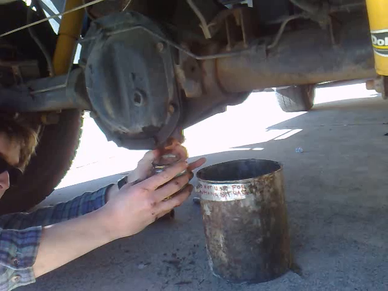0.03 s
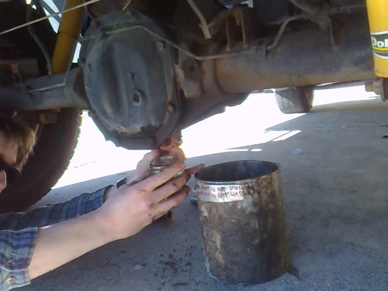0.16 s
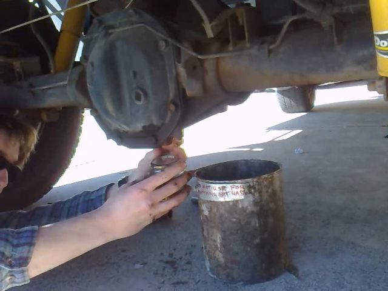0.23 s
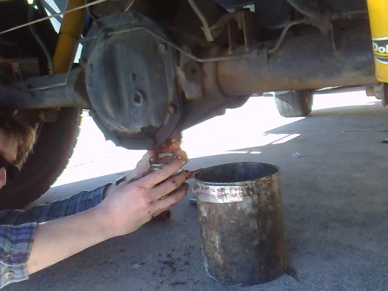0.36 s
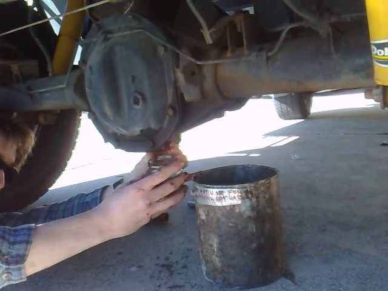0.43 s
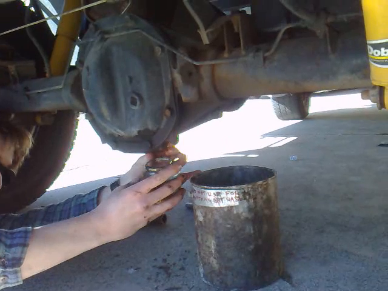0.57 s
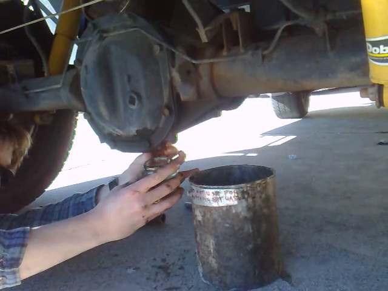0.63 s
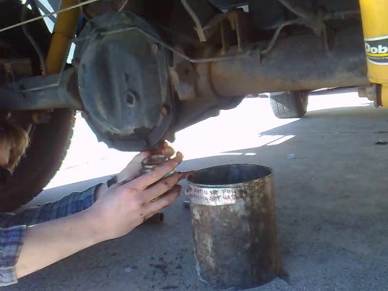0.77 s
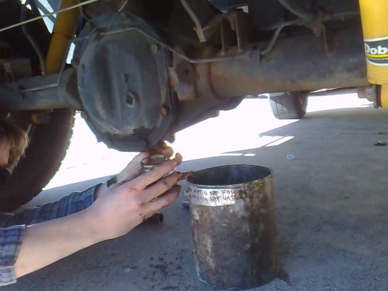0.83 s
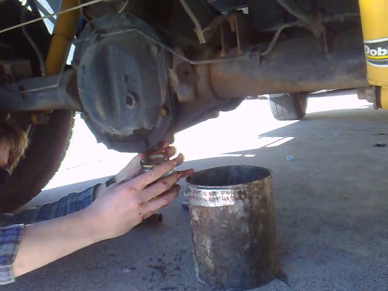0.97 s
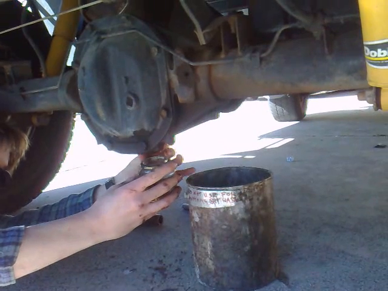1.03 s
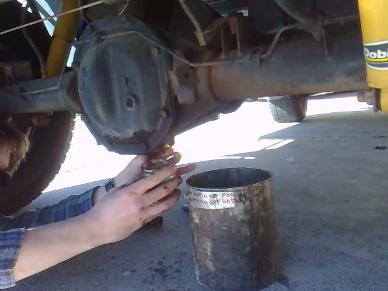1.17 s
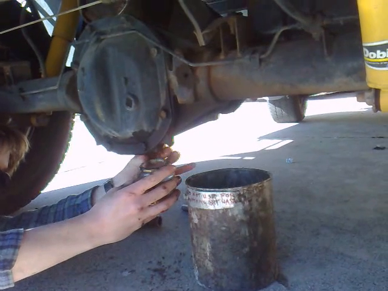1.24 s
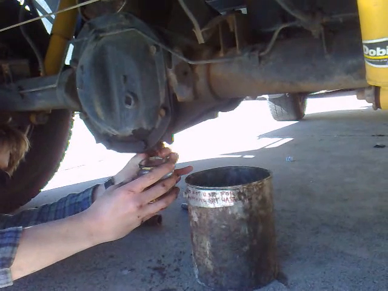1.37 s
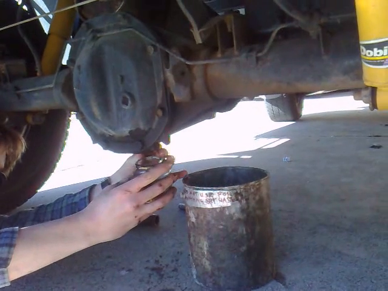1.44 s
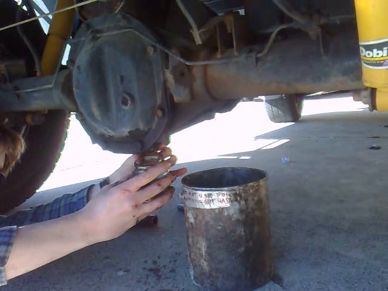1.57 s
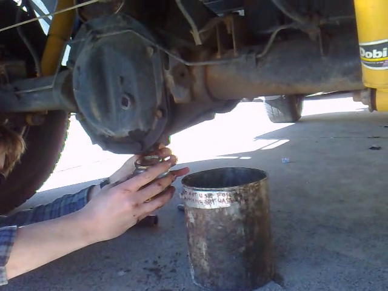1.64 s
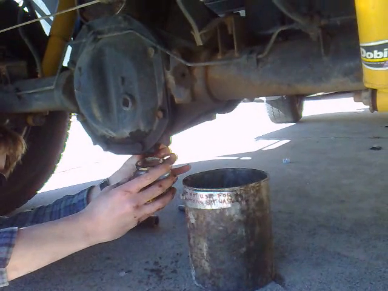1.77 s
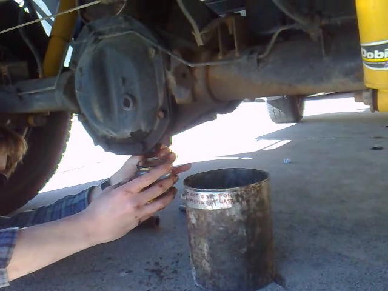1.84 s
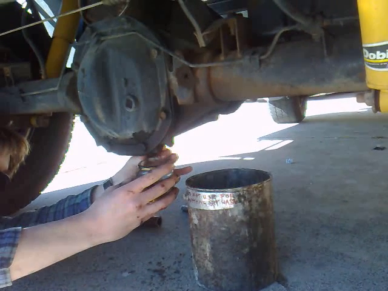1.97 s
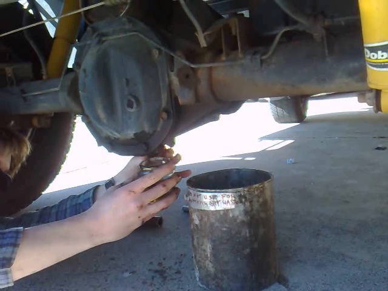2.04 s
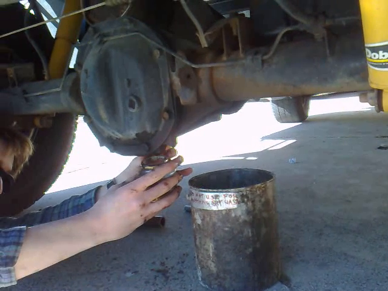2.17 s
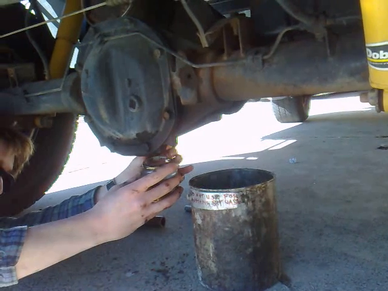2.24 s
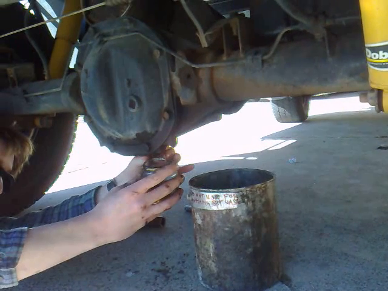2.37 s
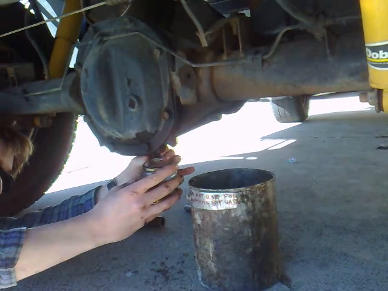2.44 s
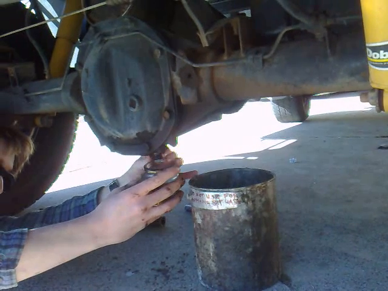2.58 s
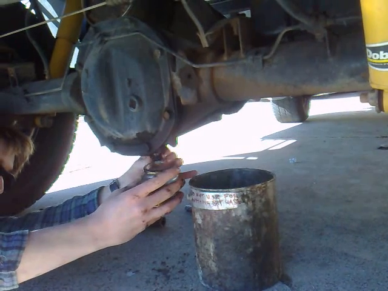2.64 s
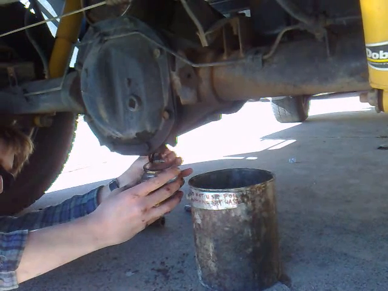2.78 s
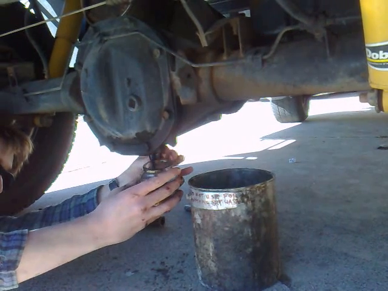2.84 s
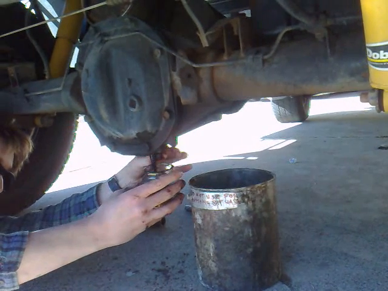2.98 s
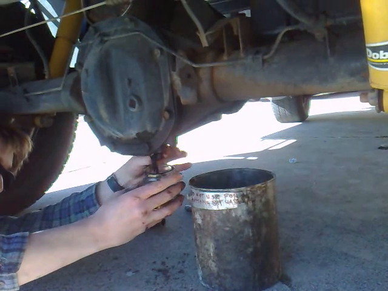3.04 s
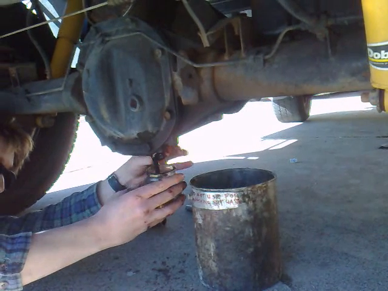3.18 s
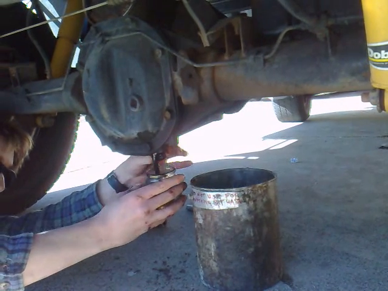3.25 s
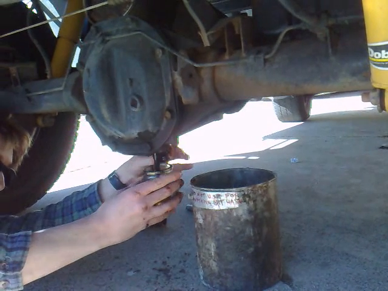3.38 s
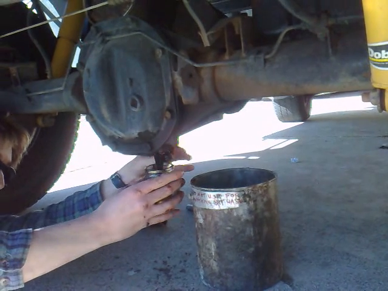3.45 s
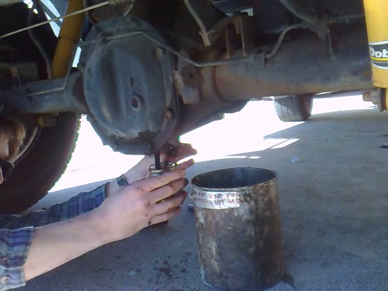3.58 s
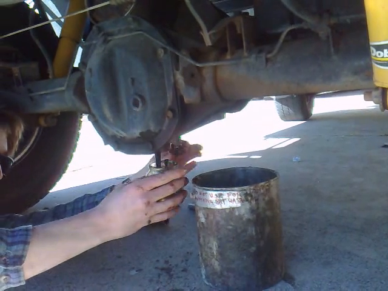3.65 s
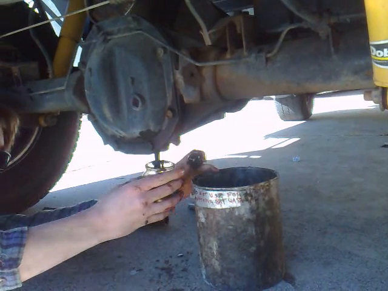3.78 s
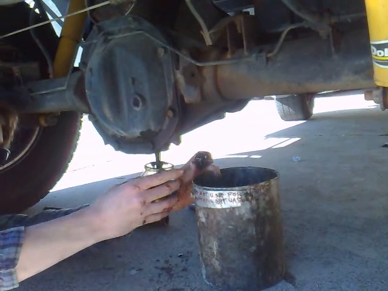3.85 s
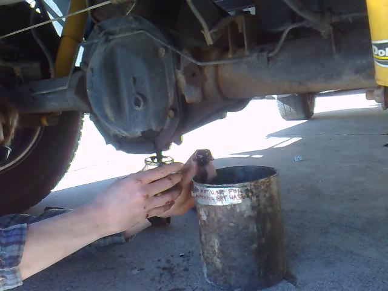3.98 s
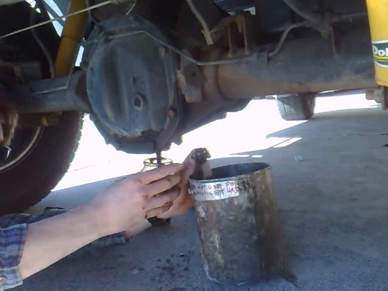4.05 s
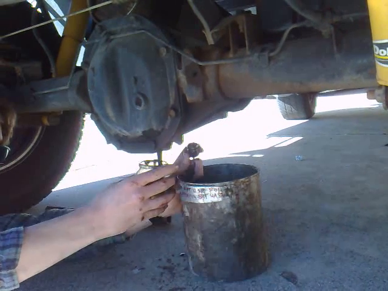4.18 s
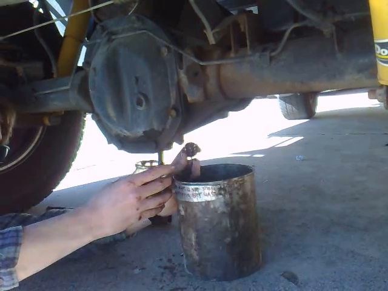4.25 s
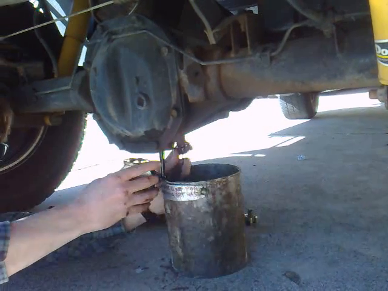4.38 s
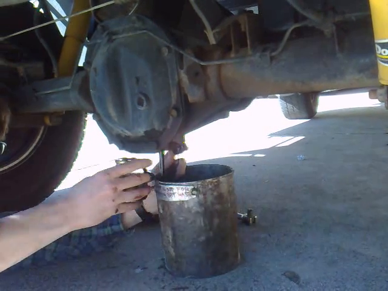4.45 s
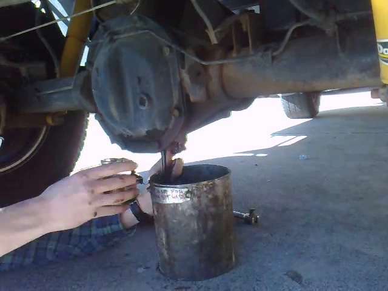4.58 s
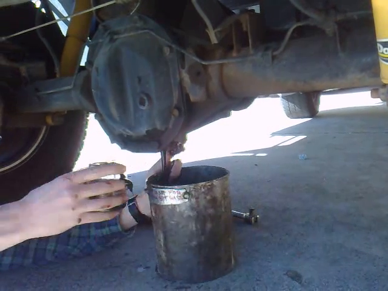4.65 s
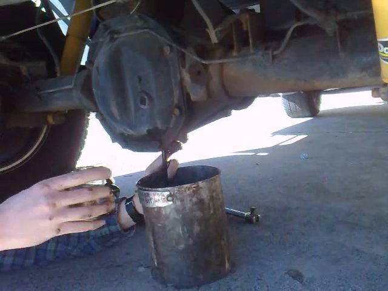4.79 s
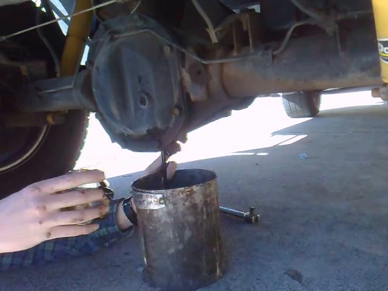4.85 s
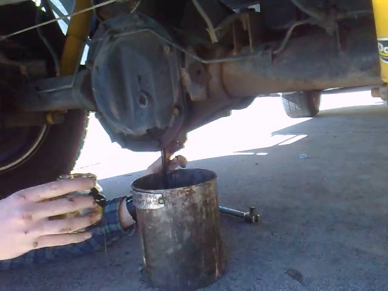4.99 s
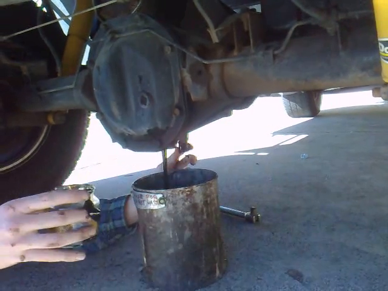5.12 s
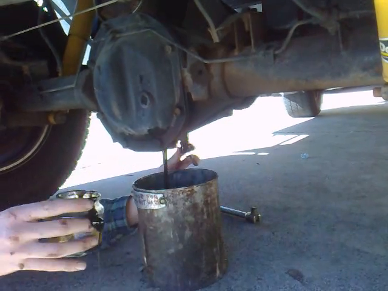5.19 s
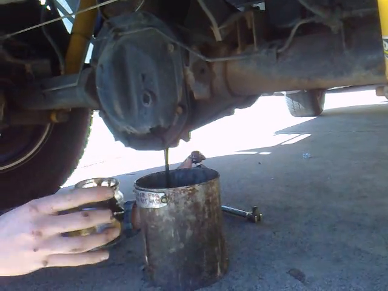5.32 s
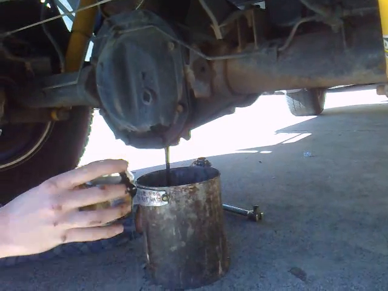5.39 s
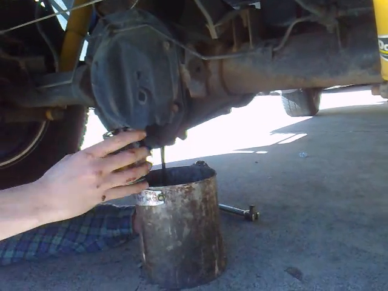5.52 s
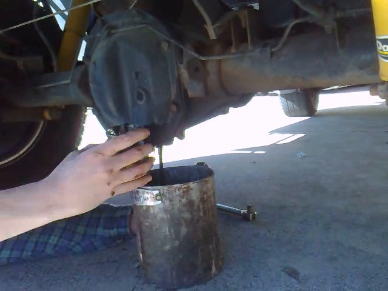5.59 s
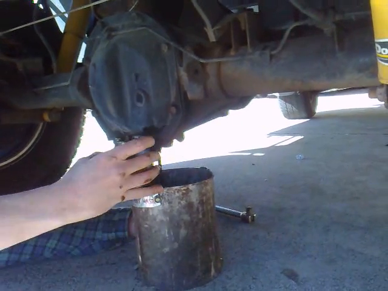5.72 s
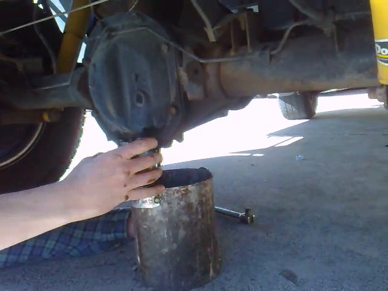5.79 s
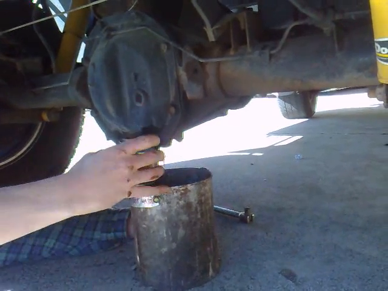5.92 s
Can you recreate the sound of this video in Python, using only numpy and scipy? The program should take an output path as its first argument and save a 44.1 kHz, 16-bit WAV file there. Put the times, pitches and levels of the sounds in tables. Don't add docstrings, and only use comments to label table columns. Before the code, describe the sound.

Faint traffic rumble with tiny ticks and a glass tap, then a loud, jerky metallic scrape of an empty pail on concrete.

```python
import sys
import numpy as np
from scipy import signal
from scipy.fft import rfft, irfft, next_fast_len
from scipy.io import wavfile
from scipy.ndimage import uniform_filter1d, map_coordinates

SR = 44100
rng = np.random.default_rng(int(sys.argv[2]) if len(sys.argv) > 2 else 0)


def transcribe(u):
    v = np.clip(np.atleast_2d(u).T, -1, 1)
    q = np.round(v * 32767).astype(np.int16)
    wavfile.write(sys.argv[1], SR, q)


def invert_db(level):
    return 10 ** (np.asarray(level, dtype=float) / 20)


N = 262130


def unit(x):
    return x / np.sqrt(np.mean(x ** 2) + 1e-20)


def along(points, hz):
    f, v = np.transpose(points)
    return np.interp(np.log(hz + 1), np.log(f + 1), v)


def curves(rows, off=None):
    s, *cols = np.transpose(rows)
    return [np.interp(np.arange(N) / SR, s, c, off, off) for c in cols]


def wobble(rate):
    knots = rng.standard_normal(int(N * rate / SR) + 4)
    coarse = np.arange(0, N + 64, 64)
    return np.interp(np.arange(N), coarse, map_coordinates(knots, [coarse * rate / SR]))


def filtered(x, response):
    m = next_fast_len(N + SR // 2)
    return irfft(rfft(x, m) * response(np.fft.rfftfreq(m, 1 / SR)), m)[:N]


def coloured(x, spectrum):
    return filtered(x, lambda hz: invert_db(along(spectrum, hz)))


def causal(x, spectrum):
    c = irfft(np.log(invert_db(along(spectrum, np.fft.rfftfreq(4096, 1 / SR))) + 1e-6))
    c[1:2048] *= 2
    c[2049:] = 0
    return signal.fftconvolve(x, irfft(np.exp(rfft(c))))[:N]


def resonant(x, modes, rocking_db, rate):
    m = next_fast_len(N)
    f, spec = np.fft.rfftfreq(m, 1 / SR), rfft(x, m)
    bank = [invert_db(db) * 1j * f * w / (c * c - f * f + 1j * f * w) for c, w, db in modes]
    y = sum(invert_db(rocking_db * wobble(rate)) * irfft(spec * h, m)[:N] for h in bank)
    return y / np.sqrt(np.mean(np.sum(np.abs(bank) ** 2, axis=0)))


def rush(spectrum, patchy_db):
    z = signal.stft(rng.standard_normal(N + 512), nperseg=512)[2]
    field = uniform_filter1d(uniform_filter1d(rng.standard_normal(z.shape), 6, 0), 14, 1)
    patchy = signal.istft(z * invert_db(patchy_db * unit(field)), nperseg=512)[1][:N]
    return unit(coloured(patchy, spectrum))


def burst(s, t60, attack):
    env, t = np.zeros(N + SR), np.arange(SR // 4) / SR
    env[round(s * SR):][:len(t)] = invert_db(-60 * t / t60) * (1 - np.exp(-t / attack))
    return env[:N]


def ring(s, modes, attack=0.0006):
    out, t = np.zeros(N + SR), np.arange(SR // 4) / SR
    tones = sum(invert_db(db - 60 * t / t60) * np.sin(2 * np.pi * hz * t) for hz, db, t60 in modes)
    out[round(s * SR):][:len(t)] = (1 - np.exp(-t / attack)) * tones
    return out[:N]


def chatter(rate, spread_db, t60):
    starts = (rng.random(N) < rate / SR) * invert_db(spread_db * rng.exponential(1, N).clip(0, 3))
    puffs = signal.lfilter([1], [1, -invert_db(-60 / (t60 * SR))], starts)
    return unit(puffs * rng.standard_normal(N))


# (frequency [Hz], decay time t60 [s])
UNDERBODY_DECAY = [(200, 0.18), (2000, 0.11), (10000, .07)]


def underbody(x):
    hz, t, z = signal.stft(rng.standard_normal(SR // 4), SR, nperseg=256)
    decay = invert_db(-60 * t / along(UNDERBODY_DECAY, hz)[:, None])
    tail = signal.istft(z * decay, SR, nperseg=256)[1]
    return signal.fftconvolve(np.pad(x, (150, 0)), tail / np.linalg.norm(tail))[:N]


# (frequency [Hz], spectral level [dB per Hz])
HISS_SPECTRUM = [(2940, -48), (5000, -3.5), (6410, -7.5), (8540, -7.5), (15100, -7), (16000, -4)]
DUCK_DB, DUCK_FROM_S, DUCK_HOLD_S, RECOVER_S = 6, 4.36, 0.92, 0.3


def preamp_hiss():
    since = np.arange(N) / SR - DUCK_FROM_S
    ducked = (since > 0) * np.clip(1 - (since - DUCK_HOLD_S) / RECOVER_S, 0, 1)
    return invert_db(-65.0 - DUCK_DB * ducked) * unit(coloured(rng.standard_normal(N), HISS_SPECTRUM))


def engine(rows, orders, unsteady_db):
    hz, = curves(np.array(rows)[:, :2])
    db, = curves(np.array(rows)[:, ::2], off=-120)
    turn = 2 * np.pi * np.cumsum(hz * (1 + 0.0059 * wobble(8))) / SR
    tones = sum(invert_db(g + unsteady_db * wobble(3.043)) * np.sin(k * turn) for k, g in orders)
    return invert_db(db - 0.5) * tones


# (frequency [Hz], spectral level [dB per Hz])
RUMBLE_SPECTRUM = [(4.7, -61.5), (8.0, -30.5), (22, -31.5), (40, -10.5), (75, -0.5), (93, -1), (114, -9.5),
                   (182, -26), (200, -18), (260, -45.5), (440, -120)]
ROAD_SPECTRUM = [(76, -31), (130, -1), (215, -6), (242, -3.5), (313, -6), (1000, -26.5), (1300, -44.5),
                 (2200, -120)]
TREAD_SPECTRUM = [(410, -41), (700, -5.5), (931, -5), (1330, -2.5), (1460, -2.5), (2280, 0), (2980, -7.5),
                  (4520, -10.5), (8000, -26.5), (10400, -44.5), (17600, -120)]
# (time [s], half width [s], swell [dB])
VEHICLE_PASSES = [
    (.3, 0.16, 7),
    (2.5, 0.49, 3),
    (4.2, 0.65, 4),
    (5.63, 0.25, 9),
]
# (time [s], firing frequency [Hz], level [dB])
TRUCK_RUN = [
    (0, 95.3, -58.5),
    (1, 102.3, -52.5),
    (2, 107, -54.5),
    (3, 111.1, -54),
    (3.5, 110.6, -63.5),
]
CAR_RUN = [(2.8, 66.1, -44.5), (3.15, 74.2, -48), (3.39, 68.6, -45.5), (4.0, 67.2, -44), (4.3, 66.8, -34),
           (4.56, 65.65, -42), (4.72, 67, -37.5), (5.19, 77.8, -47), (5.46, 89.2, -41), (5.94, 90.3, -41)]
# (multiple of firing frequency, level [dB])
TRUCK_HARMONICS = [(1.55, -0.5), (2, -3.5), (3, -10)]
CAR_HARMONICS = [(1, 4), (2, -11), (3, -15.5), (4, -19)]
RUMBLE_DB, ROAD_DB, TYRE_DB = -44, -55.5, -62
ROAD_SWELL = 0.61


def traffic():
    t = np.arange(N) / SR
    swell_db = sum(db * np.exp(-((t - s) / width) ** 2) for s, width, db in VEHICLE_PASSES)
    far = invert_db(RUMBLE_DB + 1.7 * wobble(3.01)) * rush(RUMBLE_SPECTRUM, patchy_db=1.5)
    far += invert_db(ROAD_DB + ROAD_SWELL * swell_db) * rush(ROAD_SPECTRUM, patchy_db=1.5)
    far += invert_db(TYRE_DB + swell_db) * rush(TREAD_SPECTRUM, patchy_db=0.6)
    far += engine(TRUCK_RUN, TRUCK_HARMONICS, unsteady_db=2.5)
    return far + engine(CAR_RUN, CAR_HARMONICS, unsteady_db=2.0)


# (frequency [Hz], spectral level [dB per Hz])
CLOTH_SPECTRUM = [(240, -41.5), (400, -8), (474, 0.5), (1150, -3), (2010, -4.5), (5700, -11.5), (9000, -31),
                  (11700, -58.5), (19800, -120)]
# (start [s], length [s], level [dB])
ARM_MOVES = [
    (-.1, 0.16, -47.5),
    (.16, .3, -51),
    (.36, .12, -54),
    (3.907, 0.41, -59),
    (5.38, 0.39, -56),
    (5.697, 0.37, -57.5),
]


def sleeve():
    t = np.arange(N) / SR
    sweep = sum(invert_db(db) * np.sin(np.pi * np.clip((t - s) / length, 0, 1)) ** 2 for s, length, db in ARM_MOVES)
    return sweep * unit(coloured(chatter(1496, spread_db=-5.0, t60=0.011), CLOTH_SPECTRUM))


# (time [s], length [s], frequency [Hz], width [Hz], level [dB])
RUBS = [
    (.68, 0.13, 1360, 100, -63.5),
    (1.47, 0.04, 3660, 111.1, -64),
    (1.83, 0.067, 556, 160, -60.5),
    (2.56, .025, 4600, 300, -62),
    (2.693, .03, 1410, 400, -55.5),
    (2.828, 0.024, 600, 150, -55),
    (3.623, 0.038, 1350, 120, -61),
    (5.427, 0.048, 2898, 200, -56),
]


def squeaks():
    t, out = np.arange(N) / SR, np.zeros(N)
    for s, length, hz, width, db in RUBS:
        band = unit(coloured(rng.standard_normal(N), [(hz - 3 * width, -60), (hz, 0), (hz + 3 * width, -60)]))
        out += invert_db(db) * np.sin(np.pi * np.clip((t - s) / length, 0, 1)) * band
    return out


# (time [s], peak level [dB], pitch [Hz])
SMALL_TICKS = [(0.424, -44.5, 1900), (0.7864, -53, 1900), (0.83, -44.5, 3630), (1.462, -47, 3670),
               (1.4894, -65, 3700), (1.6723, -44, 3280), (2.1031, -45, 4240), (2.51, -50, 4000),
               (2.5648, -53, 4580), (2.707, -42, 1300), (2.7433, -44, 4260), (2.918, -42, 2040),
               (3.3494, -49, 4860), (3.3852, -47, 4030), (3.6314, -53, 2733), (4.0255, -43.5, 2650),
               (5.3076, -52.5, 2845), (5.368, -40, 2890), (5.445, -47, 2930), (5.6954, -53, 2610),
               (5.7804, -47, 2050), (5.8928, -41, 4900)]
# (frequency [Hz], level [dB])
TICK_CRACK = [(300, -20), (1200, -4), (3000, 0), (5800, -3), (7000, -20), (15000, -35)]
TICK_T60_S = 0.018


def ticks():
    grit = unit(coloured(rng.standard_normal(N), TICK_CRACK))
    out = np.zeros(N)
    for s, db, hz in SMALL_TICKS:
        out += invert_db(db - 11) * ring(s, [(hz, 0, TICK_T60_S)])
        out += invert_db(db - 3) * burst(s, 0.0173, 0.00079) * grit
    return out


# (frequency [Hz], level [dB], decay time t60 [s])
LATCH_MODES = [(830, -10.5, 0.016), (2509, 1, 0.0096), (2123, -9, 0.007), (3013, 0, 0.0072),
               (3530, 5, 0.0077), (3840, 0.5, 0.0069), (4980, 0.5, 0.011), (5500, -4, 0.006),
               (8640, -19, 0.0079)]
HOUSING_MODES = [(200, 0.5, 0.0406)]
# (frequency [Hz], level [dB])
LATCH_CRACK = [(500, -3.5), (1500, -8), (3000, -1.5), (5500, -10), (8000, -19), (15000, -32)]
CLICK_S = 0.1361


def click():
    crack = burst(CLICK_S, 0.011, 0.0002) * unit(coloured(rng.standard_normal(N), LATCH_CRACK))
    rattle = burst(CLICK_S, 0.06, 0.0003) * rng.standard_normal(N)
    latch = ring(CLICK_S, LATCH_MODES, attack=0.00025)
    thump = ring(CLICK_S + 0.0024, HOUSING_MODES, attack=0.0006)
    return invert_db(-17) * crack + invert_db(-36) * rattle + invert_db(-6.0) * latch + invert_db(-14) * thump


# (frequency [Hz], level [dB], decay time t60 [s])
JAR_MODES = [(780, 1.5, 0.042), (850, -7, 0.025), (1350, -14, 0.041), (4960, -14, .05), (5350, -14, 0.058),
             (6480, -6, .025), (6500, -4, 0.045)]
# (frequency [Hz], level [dB])
PLUG_CRACK = [(500, -32), (1000, 0.5), (2300, 3.5), (3500, -4), (5200, -6.5), (6500, -7.5), (8000, -19),
              (16000, -20)]


def jar():
    crack = burst(3.7097, 0.029, 0.0021) * unit(coloured(rng.standard_normal(N), PLUG_CRACK))
    return invert_db(-30.5) * ring(3.7112, JAR_MODES, attack=0.00074) + invert_db(-31.0) * crack


# (time [s], level [dB], tick re knock [dB])
HAND_KNOCKS = [
    (4.171, -37.5, -24),
    (4.249, -30, -9),
    (4.3586, -14.5, -15),
]
# (frequency [Hz], level [dB], decay time t60 [s])
HELD_MODES = [(321.6, -8, 0.048), (466, -2.5, 0.062), (506, 2, 0.087), (566, -3.5, 0.15),
              (680, -1.5, 0.037), (810, -10.5, 0.068), (945, -11, 0.044)]


def knocks():
    grit = unit(coloured(rng.standard_normal(N), CLOTH_SPECTRUM))
    out = np.zeros(N)
    for s, db, tick_db in HAND_KNOCKS:
        tick = invert_db(tick_db) * burst(s, 0.023, 0.00087) * grit
        out += invert_db(db) * (ring(s, HELD_MODES, attack=0.0024) + tick)
    return out


# (start [s], fastest [s], end [s], rim scrape level [dB], weight on the bottom [dB])
PAIL_SHOVES = [
    (4.359, 4.395, 4.415, -22, 1),
    (4.409, 4.466, 4.512, -17, 1),
    (4.526, 4.555, 4.68, -19, -1.5),
    (4.627, 4.765, 4.87, -19, -4.5),
    (4.842, 4.863, 4.94, -16.5, -10),
    (4.93, 4.958, 4.997, -19.5, -12.5),
    (4.995, 5, 5.025, -24, -6),
    (5.017, 5.134, 5.165, -23, -3),
]
SLACK_DB = [10.35, 9.7, 6, 5.8]
WEIGHT_RESPONSE = [0.041, 0.71, 1, .4]
PART_OFFSET_DB = [0, 0.5, 0.5, -15]
BITE_DB_PER_S, STOP_DB_PER_S = 6999, [1200, 900, 600, 1300]
HANDLE_LOOSE_DB, HANDLE_GRIPPED_S = 13.5, 4.52


def shoving():
    t = np.arange(N) / SR
    slack_db, response, offset_db, stop = [
        np.array(v)[:, None] for v in (SLACK_DB, WEIGHT_RESPONSE, PART_OFFSET_DB, STOP_DB_PER_S)]
    levels_db = np.full((4, N), -120.)
    span = slice(round((PAIL_SHOVES[0][0] - 0.05) * SR), round((PAIL_SHOVES[-1][2] + 0.2) * SR))
    u = t[span]
    for start, fastest, end, db, weight_db in PAIL_SHOVES:
        slack = np.interp(u, [start, fastest, end], [1, 0, 1])
        now = db + offset_db + response * weight_db - slack_db * slack
        now -= BITE_DB_PER_S * (start - u).clip(0) + stop * (u - end).clip(0)
        levels_db[:, span] = np.maximum(levels_db[:, span], now)
    levels_db[3] += HANDLE_LOOSE_DB * (t < HANDLE_GRIPPED_S)
    return levels_db


# (time [s], peak level [dB], boom re peak [dB])
GRIT_CATCHES = [(4.3587, -24, 7), (4.396, -10, 5.5), (4.4104, -11, -5.5), (4.4218, -6.5, -2.5),
                (4.458, -2.5, -4), (4.4777, -2.5, -4), (4.4937, -16, -1), (4.5291, -7.5, -19.5),
                (4.5415, -12.5, -16), (4.5545, -13.5, -4.5), (4.5827, -7, -12), (4.6234, -18, -11),
                (4.6603, -9, -4), (4.6782, -11, -19), (4.7242, -12, -11.5), (4.7451, -8, -17),
                (4.763, -10.5, -3), (4.799, -9, -23), (4.859, 0, -24), (4.8709, -10, -16),
                (4.9005, -15, -9.5), (4.9192, -11, -6), (4.947, -14.5, -22), (4.9613, -9, -11),
                (4.994, -14.5, -15), (5.006, -10, -5), (5.0454, -15, -8.5), (5.0825, -18.5, -0.5),
                (5.117, -13.5, 6), (5.1357, -10, -4)]
# (frequency [Hz], width [Hz], level [dB])
RIM_MODES = [(3430, 100, -11.5), (3840, 120, -13.5), (4470, 150, -4.5), (4630, 120, -4), (5110, 240, 6.5),
             (5400, 110, -1), (5340, 89, -1), (5740, 150, 6), (6380, 89, -9.5), (6600, 200, -27.5),
             (7170, 200, -9.5), (7760, 200, -18.5)]
WALL_MODES = [(1077, 60, -41.5), (1386, 16, -8.5), (1483, 82, -1), (1679, 52, -1), (2025, 130, -0.5),
              (2148, 130, 5.5), (2283, 29, 3.5), (2605, 40, -6), (2930, 140, -17.5)]
DRUM_MODES = [(269, 30, -22), (325, 22, -4), (390, 29, -8), (462, 20, -2), (497, 14, -3), (525, 14, -14),
              (551, 13, 7)]
HANDLE_MODES = [(707, 12, -11.5), (793, 26, 1.5), (853, 28, 0), (959, 36, -13.5)]
# (frequency [Hz], spectral level [dB per Hz])
SCRATCH_SPECTRUM = [(120, -51), (200, -17.5), (420, -5.5), (1180, -16), (1600, -8.5), (2150, -9.5),
                    (3660, -17.5), (5680, -3), (8000, -17), (10500, -28), (13500, -29), (15800, -31.5)]
# (frequency [Hz], level [dB])
RADIATION = [(100, -2.5), (250, 1.5), (6800, -3), (9000, -8), (12000, -21), (16000, -30)]
GRIT_T60_S, GRIT_WALL_DB, GRIT_WEIGHT_RESPONSE = 0.023, -3.5, 0.9
GRIT_SNAP_DB, GRIT_SNAP_T60_S = -7.5, 0.0067


def pail():
    levels_db = shoving()
    sand = [chatter(600, spread_db=3.5, t60=0.012), chatter(700, spread_db=-1.0, t60=0.016),
            chatter(300, spread_db=4, t60=0.015), chatter(310, spread_db=1.5, t60=0.018)]
    catches = np.zeros((4, N))
    for s, db, boom_db in GRIT_CATCHES:
        weight_db = [row[4] for row in PAIL_SHOVES if row[0] < s + 0.005][-1]
        wall_db = GRIT_WALL_DB + GRIT_WEIGHT_RESPONSE * weight_db
        parts_db = np.array([[0], [wall_db], [boom_db], [boom_db - 13]])
        catches += invert_db(db - 5.5 + parts_db) * burst(s, GRIT_T60_S, 0.00037)
        catches[0] += invert_db(GRIT_SNAP_DB + db) * burst(s, GRIT_SNAP_T60_S, 0.0002)
    rim, wall, drum, handle = invert_db(levels_db - 3.5) * sand + catches * rng.standard_normal((4, N))
    dust = invert_db(levels_db[0] + 1.0) * chatter(1800, spread_db=2.0, t60=0.01)
    dust += invert_db(-8) * catches[0] * rng.standard_normal(N)
    scratch = causal(dust, SCRATCH_SPECTRUM)
    scratch *= invert_db(-4.5) * np.std(rim) / np.std(scratch)
    body = resonant(rim, RIM_MODES, rocking_db=2.5, rate=14)
    body += resonant(wall, WALL_MODES, rocking_db=4.5, rate=18)
    body += resonant(drum, DRUM_MODES, rocking_db=1.8, rate=10)
    body += resonant(handle, HANDLE_MODES, rocking_db=1.0, rate=8.3)
    return causal(body, RADIATION) + scratch


def scene():
    yard = traffic() + sleeve()
    near = squeaks() + ticks() + jar() + knocks() + pail()
    snap = click()
    echoes = invert_db(-10) * underbody(near) + invert_db(-29) * underbody(snap)
    return (yard + near + snap + echoes)[None]


def band_limit(x):
    return signal.sosfilt(signal.butter(12, 16500, fs=SR, output="sos"), x)


def record(dry):
    x = dry[0] + preamp_hiss()
    x = x / (1 + abs(x / 0.8) ** 4) ** (1 / 4)
    mix = filtered(x, lambda hz: hz < 15830)[None]
    return band_limit(mix)


dry = scene()
out = record(dry)
transcribe(out)
```